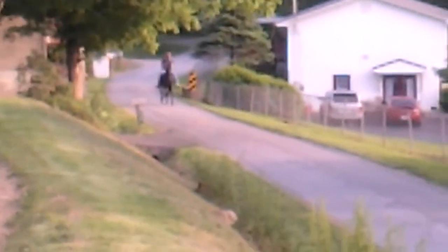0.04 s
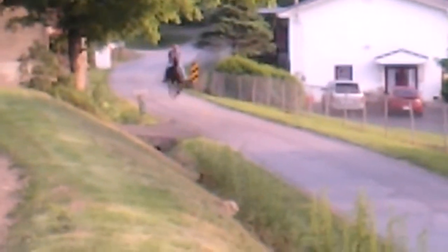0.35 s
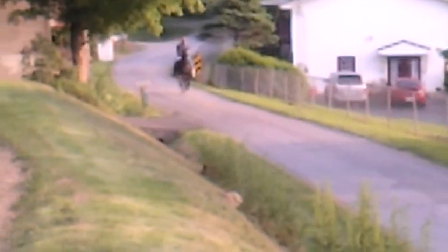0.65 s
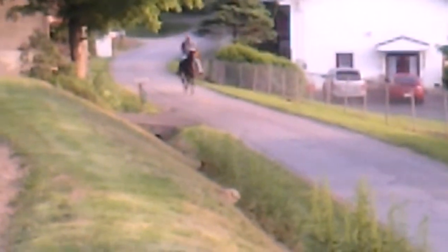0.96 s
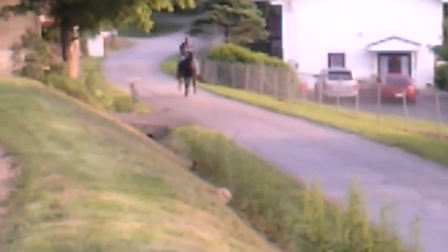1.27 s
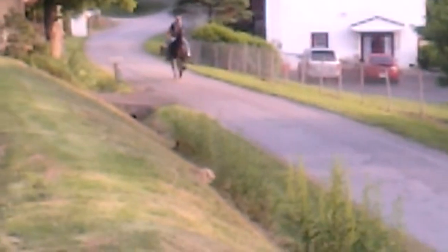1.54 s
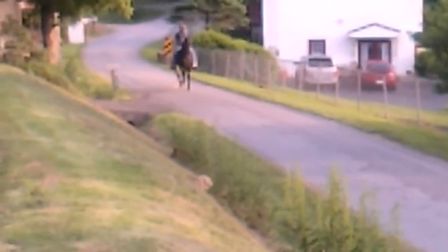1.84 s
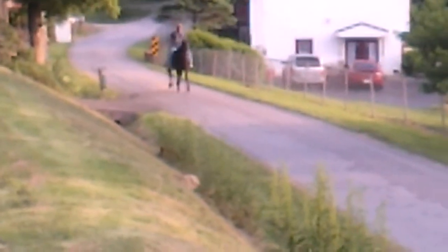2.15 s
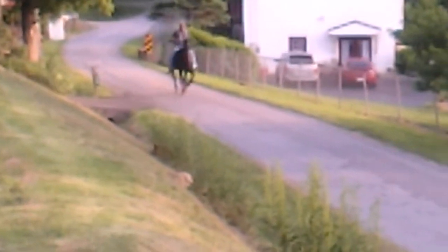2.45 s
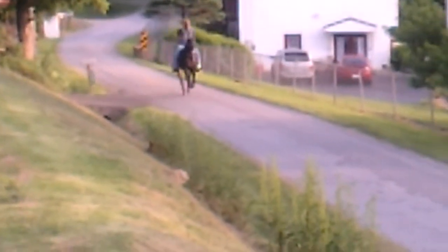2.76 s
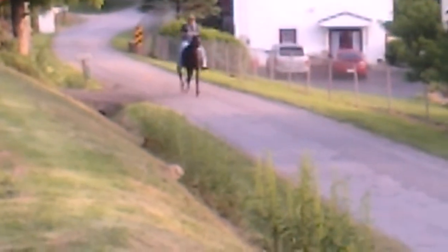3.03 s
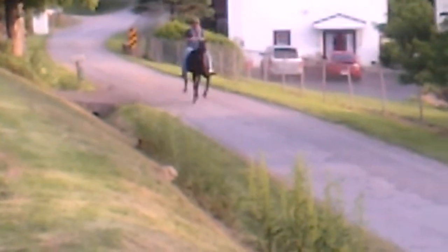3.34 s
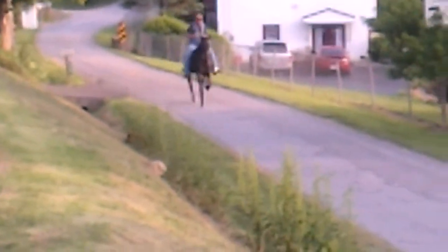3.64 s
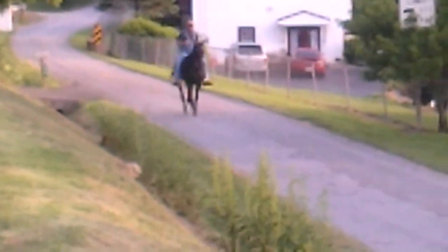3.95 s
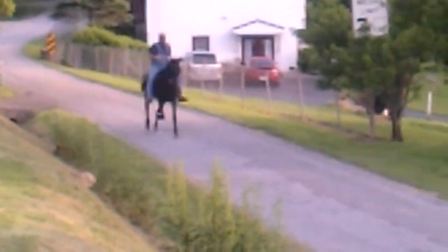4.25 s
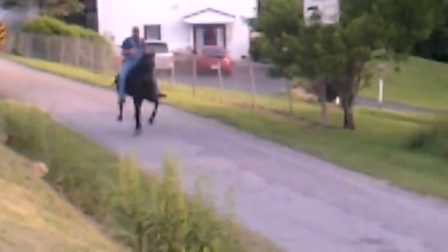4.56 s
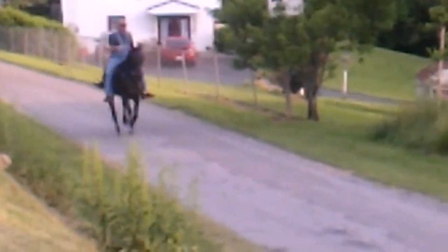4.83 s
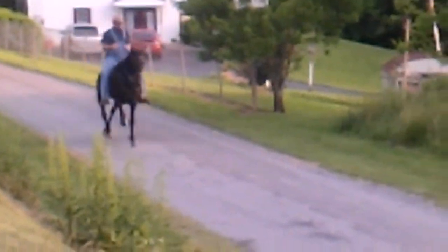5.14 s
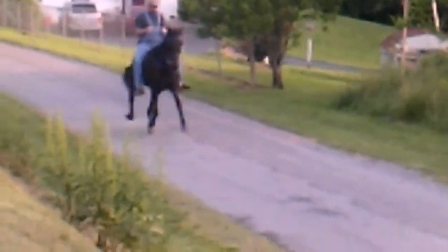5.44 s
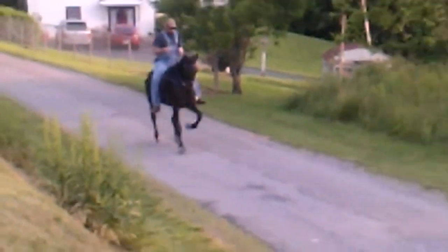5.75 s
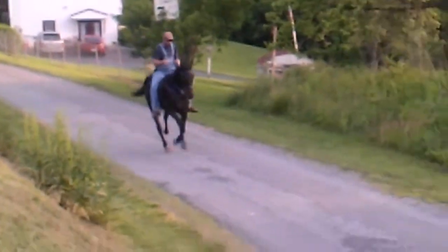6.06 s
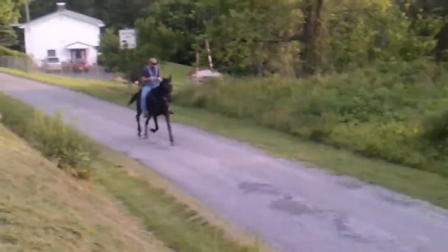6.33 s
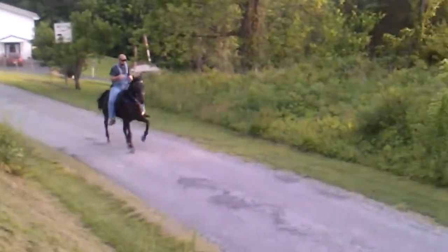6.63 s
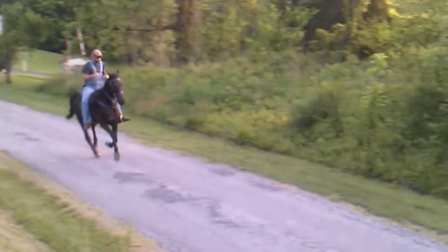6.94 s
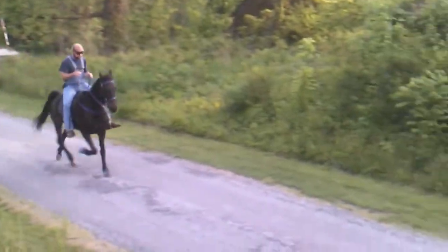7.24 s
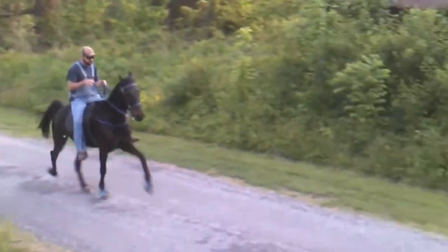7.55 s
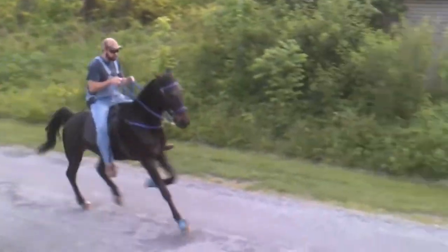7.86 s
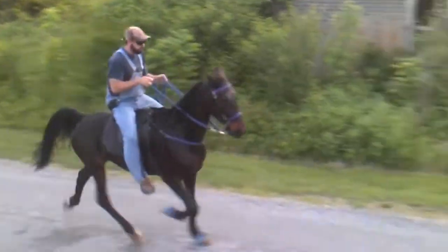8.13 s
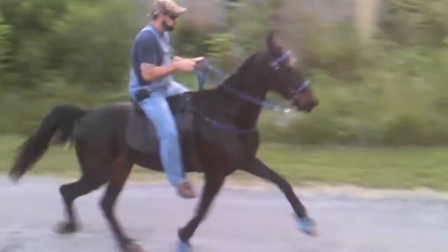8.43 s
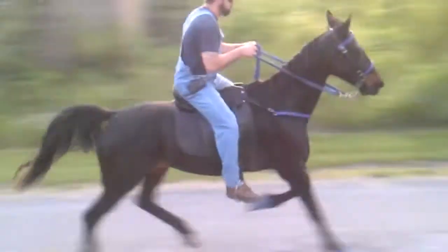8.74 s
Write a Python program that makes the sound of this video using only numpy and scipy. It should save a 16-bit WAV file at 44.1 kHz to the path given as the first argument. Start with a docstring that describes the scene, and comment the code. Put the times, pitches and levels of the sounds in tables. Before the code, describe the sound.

A shod horse comes down a paved country lane in a quick, even four-beat gait. Each hoof gives a sharp clack, a hollow knock and a short gritty scuff. The hoofbeats start far off with a light echo and grow steadily louder until the horse is right beside the microphone. Faint insects hiss throughout, while a distant dove coos and a small bird whistles thinly around the middle.

```python
"""A shod horse starts far down a paved country lane, in a quick four-beat gait; insects hiss in the verges.
Each hoof lands toe then heel, knocks hollow and scuffs over grit; a house and trees throw the sound back.
A distant dove coos at 0.5 s and twice more from 4 to 6 s, when a small bird also whistles thinly.
The hooves grow louder, with more stray taps, until the horse draws level near 9 s."""
import sys
import numpy as np
from scipy import signal
from scipy.fft import rfft, irfft
from scipy.io import wavfile

SR = 44100
rng = np.random.default_rng(int(sys.argv[2]) if len(sys.argv) > 2 else 0)


def waveform_to_disk(signal):
    """Save audio, clipped to [-1, 1], as 16-bit WAV at the path in sys.argv[1]."""
    frames = np.transpose(np.atleast_2d(signal))
    scaled = np.clip(frames, -1, 1) * 32767
    samples = np.round(scaled).astype(np.int16)
    wavfile.write(sys.argv[1], SR, samples)


N = 392049
BLOW_SAMPLES = 8192
AGE_S = np.arange(BLOW_SAMPLES) / SR
HZ = np.maximum(np.fft.rfftfreq(BLOW_SAMPLES, 1 / SR), 1)

# Path from the nearing horse; dip from the grass, clack from the shoe, a band near 2.8 kHz lifted or cut by the
# road reflection: time_s, level_db, dip_gain_db, thud_re_knock_db, clack_gain_db, notch_gain_db,
# scatter_send_db
APPROACH = [(0, -45, -3, -14.5, -2.5, 6.5, -9), (2.4, -33.5, -10, -16, 1.5, 1.5, -8.5),
            (3.5, -32, -7.5, -17.5, 0, 5.5, -9), (5.5, -26, -8, -14.5, 5, -1, -8),
            (6.2, -24, -2, -13.5, 5.5, 0.5, -10.5), (7.1, -18.5, -7, -17.5, -0.5, 0, -15),
            (7.7, -16, 0, -12.5, -7.5, 1.5, -13.5), (8.0, -15, 3.5, -13.5, 2.5, -3.5, -14.5),
            (8.9, -6.5, 6.5, -14, -2, -13.5, -20.5)]


def hooves(light_touch_db=-6.5, fore_weight_db=1, hollow_hz=869.4, sag_hz_per_db=8, pitch_spread=0.031):
    """Toe, heel and scuff sound the shoe, and together drive the hoof's hollow and the road."""
    # Hind and fore in turn, levels relative to the approach; light touch before (-) or after the hard one:
    # hard_touch_s, light_offset_s, strike_db, knock_db, scuff_db, scuff_s
    hoofbeats = [(0.032, -0.015, -7, -13, 2, 0.017), (0.1174, 0.0045, -4, -8, -5, 0.0054),
                 (0.249, -0.01, -6, -4, -10, 0.006), (0.3337, -0.012, 2, -3.5, -8.0, 0.021),
                 (0.4576, 0.0036, -1.0, -0.5, -1.5, 0.011), (0.545, 0.0034, -0.5, -2, -5, 0.008),
                 (0.66, -0.0056, -12, -6, -7, 0.01), (0.746, 0.004, 1.5, -3, -6, 0.006),
                 (0.8893, -0.0042, -1, -3, -2.5, 0.012), (0.9614, 0.005, -5, -10, -6.5, 0.012),
                 (1.081, -0.0024, -11.5, -15, -6, 0.018), (1.1562, 0.00085, 7.5, -6.5, -2, 0.018),
                 (1.3083, -0.0015, -7, -6, -4, 0.013), (1.3757, 0.002, -6.5, -2.5, -7.0, 0.013),
                 (1.5125, -0.004, -6.5, -13, -19, 0.022), (1.5489, -0.0094, -3.5, -3.5, -7, 0.015),
                 (1.6975, -0.0072, -8.5, -8.5, -8, 0.013), (1.736, -0.0006, -15.0, -8.5, -25.0, 0.011),
                 (1.891, 0.004, -6, -13, -5, 0.0044), (1.9724, -0.0047, -2, -2.5, -13, 0.011),
                 (2.112, -0.011, -3, -9, -2.5, 0.0091), (2.1884, -0.0083, -2, -6.5, -10.0, 0.024),
                 (2.298, -0.0048, -8.5, -5, -7, 0.014), (2.373, -0.0014, 4.0, -5, -5.5, 0.036),
                 (2.5114, -0.00087, 1.5, -4, -6.0, 0.014), (2.5904, -0.00065, -2.0, -3, -4.5, 0.011),
                 (2.7006, -0.0019, -9.5, -9, -9.5, 0.024), (2.7824, -0.0033, 2.0, -1, -2.5, 0.0097),
                 (2.911, 0.0066, -3.5, -5.5, -7.0, 0.026), (2.996, -0.0018, 0.5, -6.5, -17, 0.021),
                 (3.1186, -0.0069, -6.0, -10, -4, 0.014), (3.1992, -0.006, 6, -6, -12.0, 0.016),
                 (3.3266, -0.0032, -8.5, -8.5, -3, 0.006), (3.4117, 0.002, 8.5, 1.5, -14.0, 0.046),
                 (3.526, -0.0091, -10, -7.5, -8.5, 0.019), (3.6016, -0.01, -2.5, -7.5, -6.5, 0.01),
                 (3.726, 0.004, -2.5, -7, -4, 0.015), (3.811, -0.0034, 3.0, -4, -7, 0.0092),
                 (3.912, 0.00063, -6, -6.5, -5.5, 0.022), (4.0075, 0.0088, -2.0, -9, -4, 0.009),
                 (4.132, 0.007, -3.5, -9, -11.0, 0.015), (4.2188, -0.00011, 0, -4.5, -11, 0.022),
                 (4.321, -0.0061, -4.0, -6, -7, 0.023), (4.402, 0.0042, -3.0, -8.5, -7, 0.011),
                 (4.54, -0.0061, 0, -4.5, -3, 0.01), (4.6199, -0.00043, 5, -2, -7.0, 0.046),
                 (4.7133, 0.005, -6.0, -5.5, -5.5, 0.027), (4.81, 0.005, 0, -4.5, -12.5, 0.074),
                 (4.9394, 0.0048, -5, -7, -3.0, 0.012), (5.019, 0.0036, -1.5, -3.5, -5, 0.01),
                 (5.105, 0.011, -6.5, -7, -6.5, 0.042), (5.2033, 0.0085, 2, -10, -19, 0.014),
                 (5.3378, -0.0031, -5.5, -8, -2.5, 0.012), (5.4235, -0.0056, 0.0, -2, -1.5, 0.0059),
                 (5.508, 0.0012, -7.5, -10, -7.0, 0.031), (5.608, 0.0055, -1.5, -5.5, -5, 0.0089),
                 (5.748, -0.0086, -5.5, -7, -4.5, 0.013), (5.8266, -0.0052, 3, -1, -2.5, 0.014),
                 (5.919, -0.004, -12.5, -9.5, -8.0, 0.036), (6.0096, -0.0023, -5.5, -7.5, -7, 0.017),
                 (6.1687, -0.0062, -1, -2, -3.5, 0.011), (6.2481, -0.0053, 1.0, -1.5, -7.5, 0.018),
                 (6.3343, -0.0024, -10, -4, -7, 0.021), (6.4268, -0.003, -5.0, -4, -8.0, 0.016),
                 (6.5743, -0.0048, -13, -9, -4.0, 0.022), (6.663, -0.0044, -2.5, -1, -4.5, 0.011),
                 (6.74, 0.0011, -10, -5.5, -6, 0.031), (6.846, 0.0013, 1.5, 0.5, -10.5, 0.02),
                 (6.9845, -0.00093, -7.0, -4.5, -3.5, 0.021), (7.082, 0.0094, -4, -6, -5.0, 0.025),
                 (7.153, -0.0018, -15, -6.5, -5.5, 0.04), (7.2707, -0.001, 2.5, -1.5, -13, 0.03),
                 (7.4023, -0.0044, -3.5, -4.5, -6.0, 0.02), (7.5177, -0.00078, 2, -3.5, -4, 0.013),
                 (7.562, -0.0016, -2, -7, 0.0, 0.034), (7.701, -0.0065, -4.0, -2, -10.5, 0.024),
                 (7.812, 0.008, -1, -4, -1.5, 0.019), (7.9421, -0.0021, -8, 2, -15, 0.06),
                 (8.002, -0.0078, -15.5, -5.5, -6.0, 0.021), (8.1278, -0.0025, -1.5, -4, -10, 0.014),
                 (8.2272, -0.012, -14, -7.5, -5, 0.031), (8.3643, 0.006, 1, 1.5, -8.0, 0.009),
                 (8.4335, -0.0026, -3.5, -8.5, -4.5, 0.021), (8.5566, 0.0093, -1.5, -4.5, -6.5, 0.012),
                 (8.6772, -0.0064, 1.0, -5, -7.0, 0.011), (8.79, 0.0023, 4.5, -2.5, -3.0, 0.011),
                 (8.8614, 0.0064, -5.5, -7, -4.5, 0.021)]
    # Leg weight on the road: freq_hz, gain_db
    thud_curve = [(25, -20), (70, -8), (140, -1), (250, 1.5), (350, 2.5), (480, 0.5), (900, -26),
                  (3000, -64.5)]
    out = np.zeros(N)
    for step, (time_s, light_s, strike_db, knock_db, scuff_db, scuff_s) in enumerate(hoofbeats):
        level_db, dip_db, weight_db, *_ = along(APPROACH, time_s)
        lag_s = abs(light_s)
        toe_db, heel_db = (0, light_touch_db) if light_s > 0 else (light_touch_db, 0)
        toe = from_db(toe_db) * contact(0, crush_s=0.0016)
        heel = from_db(heel_db) * contact(lag_s, crush_s=0.0017)
        scuff = slide(.5 * lag_s + .003, scuff_s) + gravel(scuff_s)

        shoe_db = shoe_colour(time_s)
        crack = sized(tint(toe + heel, shoe_db), strike_db)
        grit_colour_db = shoe_db - 2 * bump(1730, 0.63) + 2 * bump(12000, 1.0)   # less clack, more hiss
        grit = sized(tint(scuff, grit_colour_db), scuff_db)

        blow = from_db(strike_db) * (from_db(-3.5) * toe + heel)   # weight arrives with the heel
        drag = from_db(scuff_db) * scuff
        pitch_hz = hollow_hz - sag_hz_per_db * knock_db   # heavier rings lower
        pitch_hz *= 1 + pitch_spread * rng.standard_normal()
        clop = knock(blow + from_db(-1.5) * drag, time_s, pitch_hz, knock_db)

        thud_db = knock_db + weight_db + (fore_weight_db if step % 2 else 0)
        road_db = spectrum(thud_curve) + dip_db * bump(492, 0.24)
        thud = sized(tint(blow + from_db(-5) * drag, road_db), thud_db)
        add(out, time_s + min(light_s, 0), from_db(level_db) * (crack + grit + clop + thud))
    return out


def contact(delay_s, crush_s, spike=3.6):
    """Steel meets stone: a spike and a short burst of crushed grit."""
    age_s = np.maximum(AGE_S - delay_s, 0)
    force = rng.standard_normal(BLOW_SAMPLES) * (AGE_S >= delay_s) * np.exp(-(age_s / crush_s) ** 0.84)
    force[int((delay_s + .0004) * SR)] += spike
    return sized(force, 0)


def shoe_colour(time_s, modes_db=6.5):
    """Shoe spectrum in dB: each landing favours other steel modes; the road reflection lifts or cuts a band
    near 2.8 kHz, cutting it deeply as the horse draws level."""
    # Steel on asphalt: freq_hz, gain_db
    crack_curve = [(500, -17.5), (1100, -2), (1550, 5.5), (2100, 3), (2900, 1.5), (4100, 4), (5500, -0.5),
                   (6900, 2.5), (9600, -3), (11000, -4.5), (13000, -12.5), (15500, -22.5)]
    # Treble peak, sinking briefly as the horse swings close: time_s, peak_hz, peak_db, top_db
    sheen = [(0, 9400, 10, -20), (2.4, 9200, 13, -8), (5.5, 8630, 8, -1.5), (7.3, 8780, 15, -0.5),
             (7.82, 8270, 10.5, 1.5), (7.94, 3700, 7, -28), (8.125, 5070, 11, -13), (8.22, 4640, 3, -23),
             (8.36, 7840, 10, -14), (8.9, 8280, 10, -13.5)]
    *_, clack_db, notch_db, _ = along(APPROACH, time_s)
    peak_hz, peak_db, top_db = along(sheen, time_s)
    modes = sum(rng.uniform(-1, 1) * bump(hz * rng.uniform(.93, 1.07), .045)
                for hz in np.geomspace(1600, 9500, 10))
    steel_db = clack_db * bump(1780, 0.53) + peak_db * bump(peak_hz, 0.13) + modes_db * modes
    return spectrum(crack_curve) + steel_db + notch_db * bump(2790, 0.29) + top_db * bump(13630, 0.38)


def knock(force, time_s, pitch_hz, level_db, ring_db=8.0, overtone_ratio=1.76, overtone_db=5.5):
    """The hoof's hollow rings briefly, with one overtone; at a distance, grass swallows the low mids."""
    # Hollow hoof: freq_hz, gain_db
    hoof_curve = [(300, -27.5), (470, -9), (570, -19), (700, -1), (900, 0), (1200, 2), (1700, -10.5),
                  (4000, -59.5)]
    _, dip_db, *_ = along(APPROACH, time_s)
    hollow_db = ring_db * bump(pitch_hz, 0.11) + overtone_db * bump(overtone_ratio * pitch_hz, 0.019)
    return sized(tint(force, spectrum(hoof_curve) + hollow_db + dip_db * bump(554, 0.19)), level_db)


def slide(delay_s, length_s, grain_db=4.0, slip_db=2.0, patchy_db=1.0):
    """The shoe grinds to a stop in uneven slips, crushing now coarse grit, now fine."""
    # Grit bands, coarse to fine: low_hz, high_hz
    grit_bands = [(60, 1400), (1400, 3000), (3000, 5000), (5000, 7500), (7500, 10000), (10000, 17000)]
    shared_db = slip_db * slips(450)
    grains = rng.standard_normal((2, BLOW_SAMPLES))
    grains *= from_db(grain_db * np.clip(rng.standard_normal(grains.shape), -3, 3))
    grind = sum(bandpass(grains[k % 2] * from_db(shared_db + patchy_db * slips(350)), *edges_hz)
                for k, edges_hz in enumerate(grit_bands))
    age_s = np.maximum(AGE_S - delay_s, 0)
    envelope = (AGE_S >= delay_s) * np.exp(-.7 * (age_s / max(length_s, .003)) ** 1.39)
    return sized(grind * envelope, 0)


def slips(rate_hz):
    """Uneven slipping over one blow, spread about 1."""
    count = int(AGE_S[-1] * rate_hz) + 2
    return np.interp(AGE_S * rate_hz, np.arange(count), np.clip(rng.standard_normal(count), -2, 2))


def gravel(scuff_s, stones_per_s=220, spread_db=4.5, linger=0.83, level_db=-8):
    """Loose stones tick on as the scuff dies away."""
    hits = rng.random(BLOW_SAMPLES) < stones_per_s / SR
    ticks = hits * from_db(spread_db * np.clip(rng.standard_normal(BLOW_SAMPLES), -2, 2))
    progress = AGE_S / (linger * max(scuff_s, .006))
    return sized(ticks * progress * np.exp(-1.4 * progress), level_db)


def taps(hollow_hz=845, knock_re_crack_db=0.5):
    """A shoe clips the road again or flicks a stone between footfalls."""
    # Light single contacts: start_s, level_db
    touches = [(2.0509, -49), (2.7381, -45), (3.0301, -41), (3.6915, -45), (5.3581, -38), (5.5329, -39.5),
               (6.6909, -33), (6.7961, -38), (6.8756, -31.5), (7.0119, -42), (7.1907, -33), (7.2999, -30),
               (7.5502, -32.5), (7.597, -29), (7.7358, -36), (7.979, -30), (8.1071, -47), (8.1678, -33),
               (8.2515, -30), (8.4598, -29.5), (8.8122, -35)]
    out = np.zeros(N)
    for start_s, level_db in touches:
        force = contact(0, crush_s=0.0029)
        crack = sized(tint(force, shoe_colour(start_s)), level_db)
        add(out, start_s, crack + knock(force, start_s, hollow_hz, level_db + knock_re_crack_db))
    return out


def surroundings(x, echo_s=0.068, echo_db=-9):
    """House echo and tree tail, both a larger share while the horse is far."""
    # Return from house and trees: freq_hz, gain_db
    scatter_curve = [(100, 9.5), (450, 0.5), (850, -4.5), (1600, -3.5), (4000, -3), (8500, -3), (14000, -1)]
    *_, send_db = along(APPROACH, np.arange(N) / SR)
    sent = x * from_db(send_db)
    out = trees(sent)
    add(out, echo_s, from_db(echo_db) * sent)
    return tint(out, spectrum(scatter_curve))


def trees(x, t60_s=1.0, build_s=0.0089):
    """Trunks and leaves scatter sound into a thin tail."""
    age_s = np.arange(SR) / SR
    tail = rng.standard_normal(SR) * from_db(-60 * age_s / t60_s) * (1 - np.exp(-age_s / build_s))
    return signal.fftconvolve(x, tail / np.sqrt(np.sum(tail ** 2)))[:N]


def birds(waver_hz=22, flutter_db=3):
    """Gliding notes that flutter and blur on their long way."""
    # Low coos, high whistles: start_s, length_s, start_hz, end_hz, level_db
    notes = [(.465, .085, 560, 710, -51), (4.25, .26, 500, 490, -65), (5.36, .22, 497, 490, -63),
             (.35, .12, 2880, 2760, -65), (1.07, .08, 1130, 1150, -58), (4.41, .13, 7420, 7300, -54),
             (4.8, .15, 6950, 6920, -57), (4.82, .12, 7240, 7210, -58), (5.11, .15, 6880, 6960, -57),
             (5.12, .2, 7280, 7130, -57)]
    out = np.zeros(N)
    for start_s, length_s, start_hz, end_hz, level_db in notes:
        n = int(length_s * SR)
        pitch_hz = np.linspace(start_hz, end_hz, n) + waver_hz * drift(200)[:n]
        swell = signal.windows.tukey(n, .5) * from_db(flutter_db * drift(70)[:n])
        tone = np.sin(2 * np.pi * np.cumsum(pitch_hz) / SR)
        add(out, start_s, from_db(level_db) * rms_one(swell * tone))
    return out


def insects(throb_db=.9):
    """The chorus in the verges: throbbing bands of hiss."""
    # Chorus bands: centre_hz, width_hz, level_db
    chorus = [(4810, 590, -59), (4990, 38, -62.5), (8870, 1500, -62)]
    out = np.zeros(N)
    for centre_hz, width_hz, level_db in chorus:
        gain = from_db(level_db + throb_db * drift(40))
        hiss = bandpass(rng.standard_normal(N), centre_hz - width_hz / 2, centre_hz + width_hz / 2)
        out += gain * rms_one(hiss)
    return out


def air(level_db=-53, waver_db=.4):
    """Still country air: soft, nearly even noise."""
    # Air spectrum: freq_hz, gain_db
    air_curve = [(25, -6), (80, 2.5), (170, 1.5), (330, -2), (500, -6), (690, 3.5), (880, 9), (1300, -2.5),
                 (1900, -6), (3000, -8), (6800, -10), (9000, -40), (11000, -17.5), (15500, -21)]
    gain = from_db(level_db + waver_db * drift(18))
    return gain * rms_one(tint(rng.standard_normal(N), spectrum(air_curve)))


def from_db(db):
    """Amplitude ratio from dB."""
    return 10 ** (np.asarray(db) / 20)


def rms_one(x):
    """Scale to unit RMS."""
    return x / np.sqrt(np.mean(x ** 2) + 1e-20)


def sized(x, level_db):
    """Scale a blow to the energy of 10 ms at level_db RMS."""
    return from_db(level_db) * x * np.sqrt(.01 * SR / (np.sum(x ** 2) + 1e-20))


def along(curve, time_s):
    """A curve's columns at time_s."""
    times_s, *columns = np.transpose(curve)
    return [np.interp(time_s, times_s, column) for column in columns]


def spectrum(points):
    """Gain in dB over HZ, joined on a log axis."""
    freq_hz, gain_db = np.transpose(points)
    return np.interp(np.log(HZ), np.log(freq_hz), gain_db)


def bump(centre_hz, width_oct):
    """Bell of height 1 over HZ."""
    return np.exp(-.5 * (np.log2(HZ / centre_hz) / width_oct) ** 2)


def tint(x, gain_db):
    """Minimum-phase filter with the given gains."""
    cepstrum = irfft(np.log(from_db(gain_db)))
    cepstrum[1:BLOW_SAMPLES // 2] *= 2
    cepstrum[BLOW_SAMPLES // 2 + 1:] = 0
    return signal.fftconvolve(x, irfft(np.exp(rfft(cepstrum))))[:len(x)]


def bandpass(x, low_hz, high_hz):
    """Band-pass, 12 dB per octave."""
    return signal.sosfilt(signal.butter(2, [low_hz, high_hz], "band", fs=SR, output="sos"), x)


def drift(rate_hz):
    """Random wander, unit RMS."""
    knots = rng.standard_normal(int(N / SR * rate_hz) + 2)
    return rms_one(np.interp(np.arange(N) / SR * rate_hz, np.arange(len(knots)), knots))


def add(out, start_s, x):
    """Mix x in from start_s."""
    at = max(round(start_s * SR), 0)
    out[at:at + len(x)] += x[:max(N - at, 0)]


def scene(bird_wet_db=-6):
    """The horse in its lane, over the quiet of the fields; mono."""
    horse = hooves() + taps()
    calls = birds()
    mix = horse + surroundings(horse) + air() + insects() + calls + from_db(bird_wet_db) * trees(calls)
    return mix[None]


def record(dry, ceiling=0.51, asymmetry=0.072, cutoff_hz=16000):
    """The closest cracks overload the input, one side sooner, which adds a low bump; the top is cut."""
    limit = ceiling * (1 + asymmetry * np.sign(dry))
    rounded = dry / (1 + (dry / limit) ** 4) ** (1 / 4)
    return signal.sosfilt(signal.ellip(10, .2, 70, cutoff_hz, fs=SR, output="sos"), rounded)


dry = scene()
out = record(dry)
waveform_to_disk(out)
```